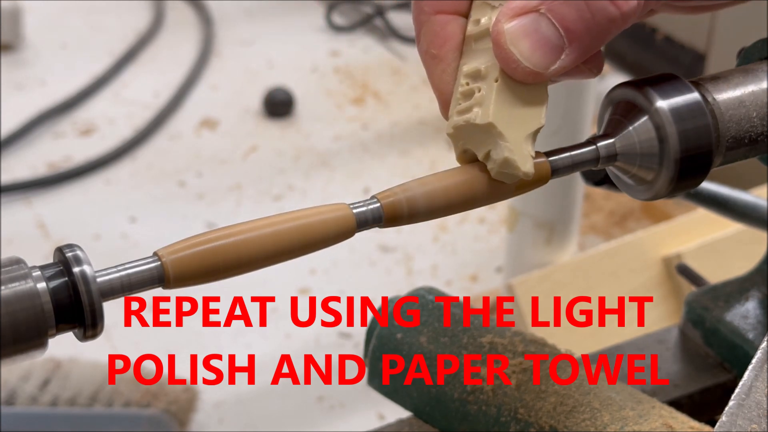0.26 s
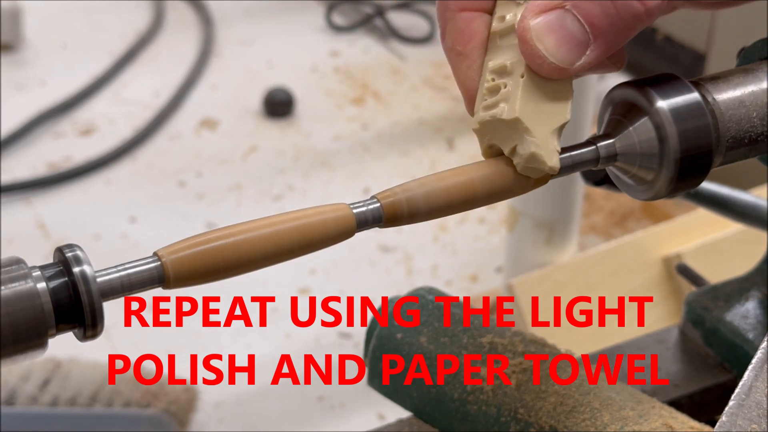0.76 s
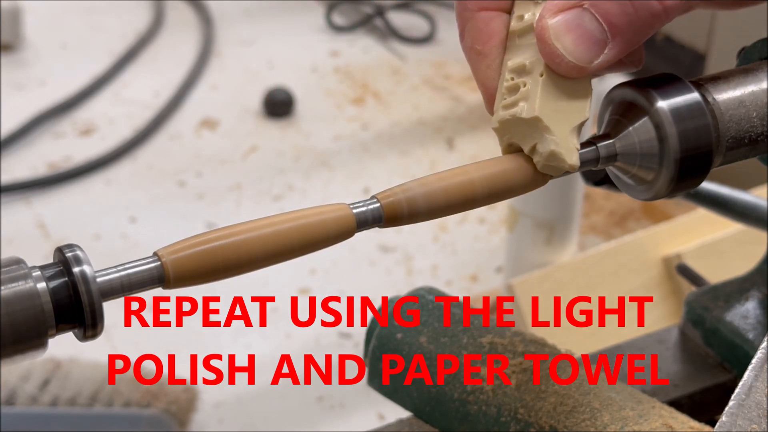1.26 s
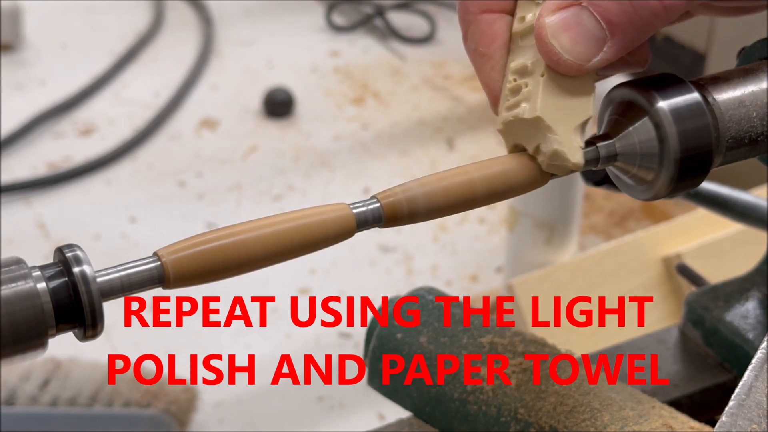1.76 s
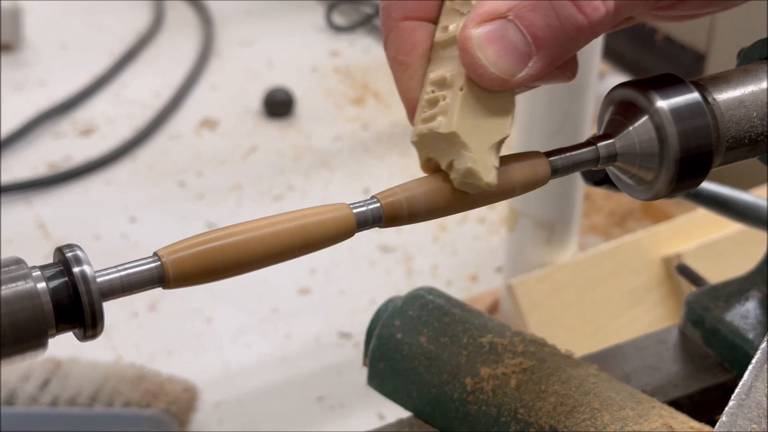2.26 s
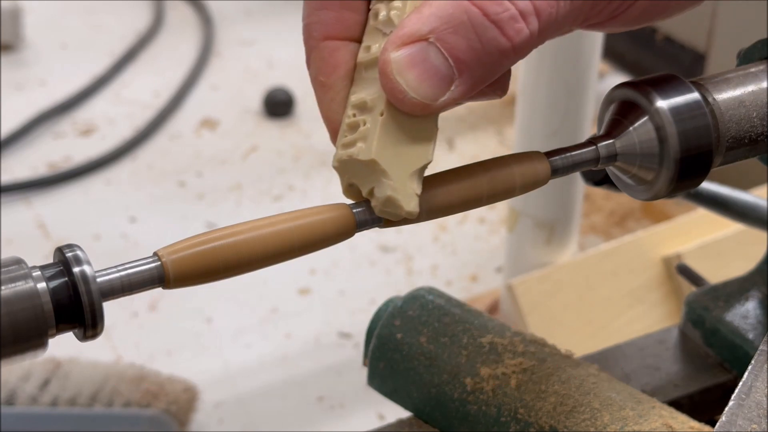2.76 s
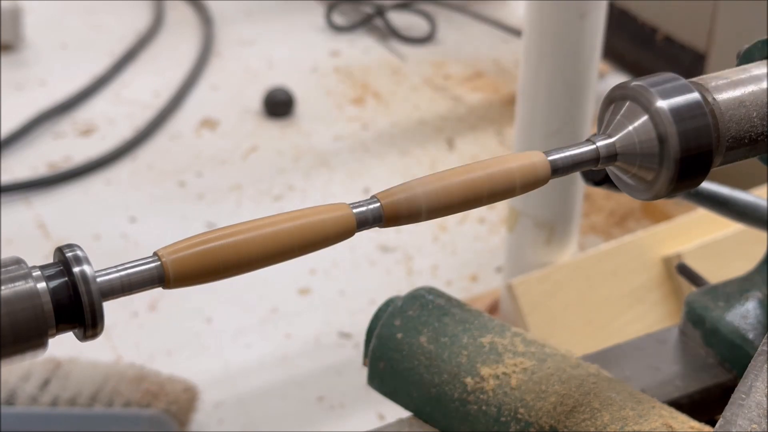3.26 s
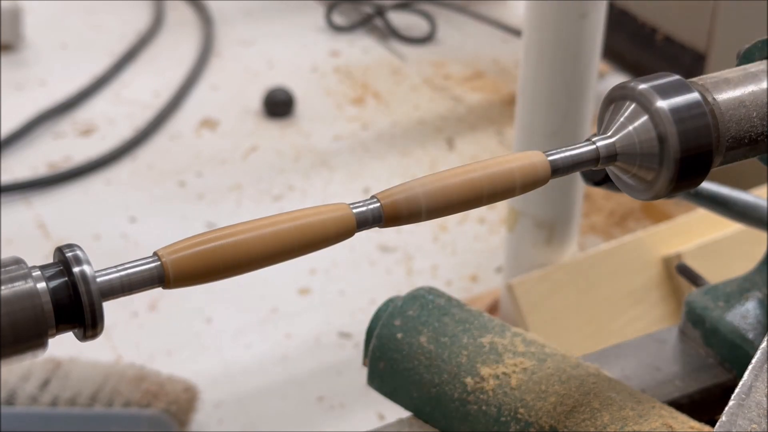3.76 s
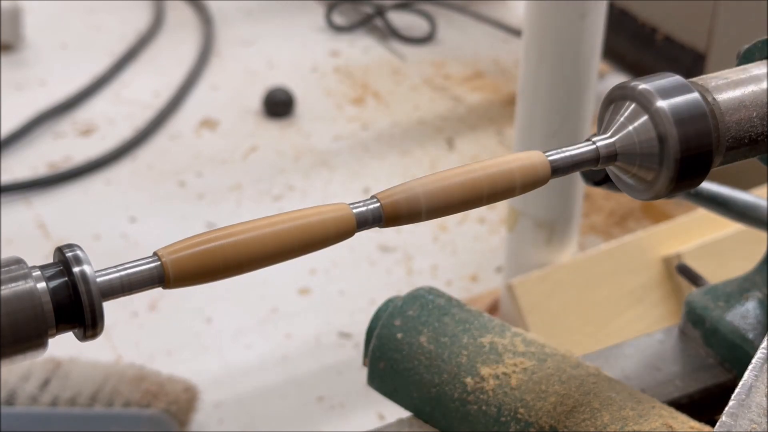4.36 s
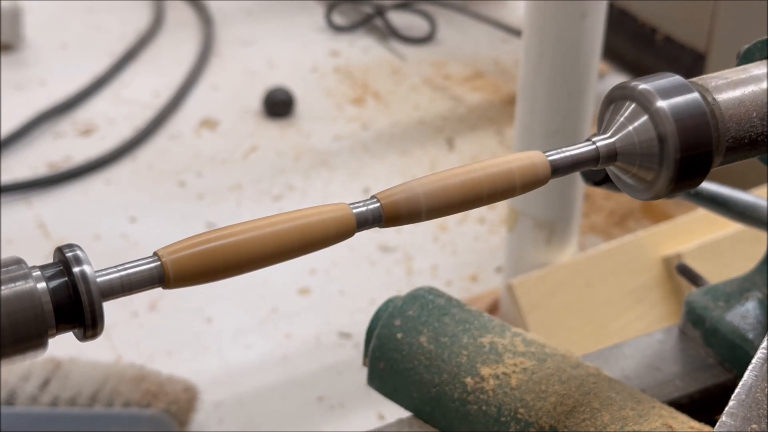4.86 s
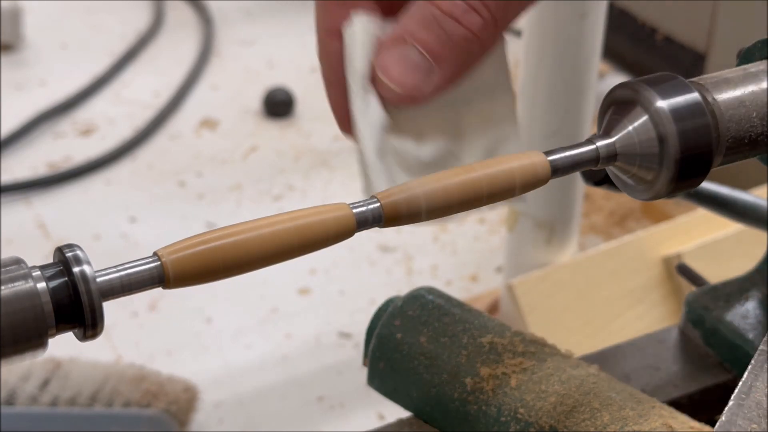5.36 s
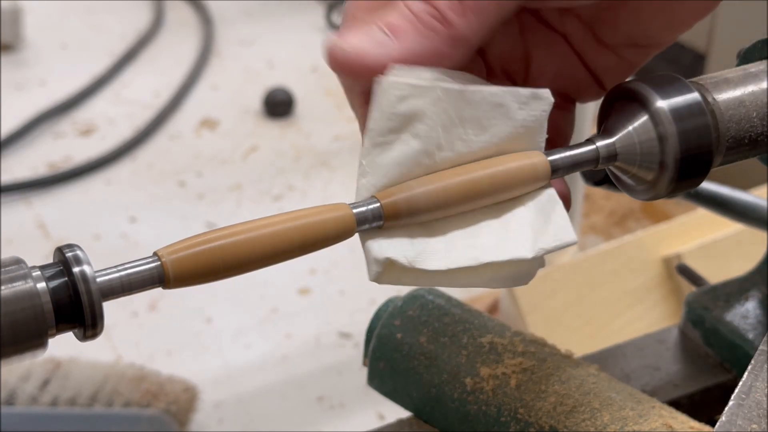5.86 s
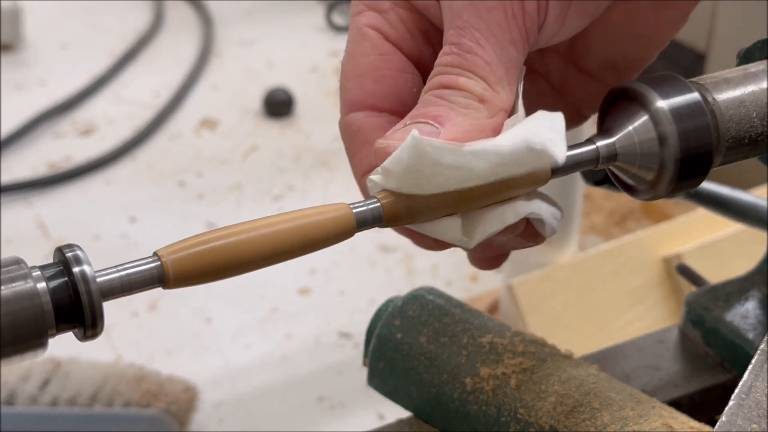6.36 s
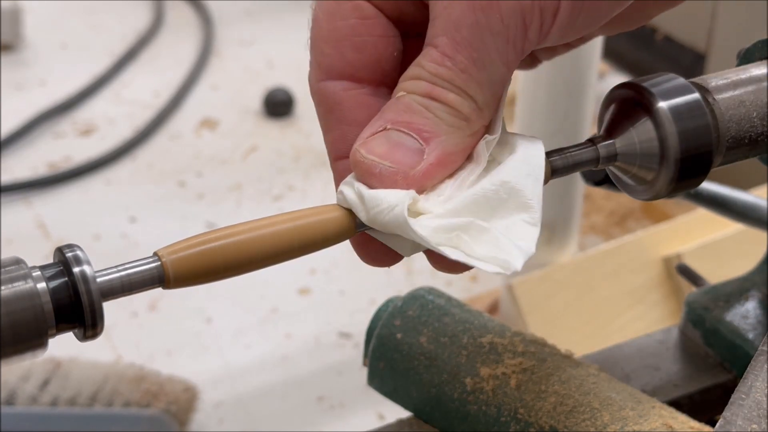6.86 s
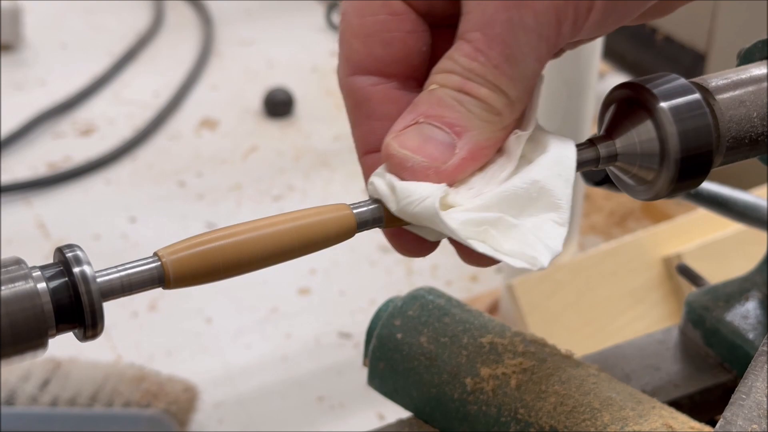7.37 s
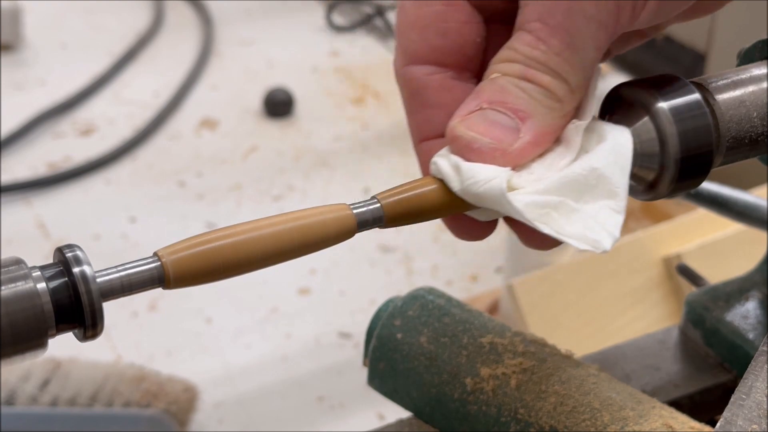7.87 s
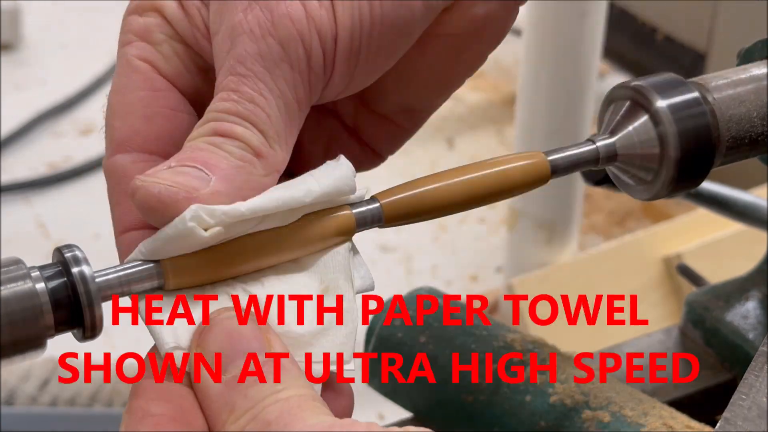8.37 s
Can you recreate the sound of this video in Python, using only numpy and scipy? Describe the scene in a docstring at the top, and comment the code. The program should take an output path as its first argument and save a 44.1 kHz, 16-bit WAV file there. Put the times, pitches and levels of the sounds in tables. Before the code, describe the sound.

A small belt-driven wood lathe is already spinning and holds a constant speed throughout, heard close and dry in stereo. Its bed combines low electrical hum, a slightly beating mid-pitched whine, rumbling belt flutter about nine times a second, a low spindle drone and fine bearing hiss. From 0 to 0.9 s a polish stick rubs faintly; thin dry scratching continues with small catches around 1.1 and 1.4 s. Fuller rubbing strokes with rough, low chatter come near 2.1 and 2.6 s, fading by about 3 s. The lathe runs alone, with a small dull knock at 3.8 s. At 5.46 s a tiny crisp tick marks the paper towel's touch, then airy friction hiss begins, strongest around 6.3 s, and slowly eases. A hard press makes a short, coarse chattering swell at 7.7 s while the drone dips. All sound cuts abruptly at 8.3 s, leaving brief silence.

```python
"""In a workshop, a belt-driven wood lathe spins a pen blank. The motor hums and whines as sines;
the belt loops a random shake through the cast frame once a lap; the spindle drones and its bearings
hiss as modulated noise. A stick of polish, then a paper towel, rubs the wood as coloured noise.
Two close microphone ports hear it, with level and phase differences, until an abrupt cut."""
import sys
import numpy as np
from scipy.fft import rfft, irfft, next_fast_len
from scipy.io import wavfile
from scipy.ndimage import map_coordinates

SR = 44100
rng = np.random.default_rng(int(sys.argv[2]) if len(sys.argv) > 2 else 0)


def wav_record(signal):
    """Record a signal, one row per channel, as 16-bit PCM in the file named by sys.argv[1]."""
    frames = np.transpose(np.atleast_2d(signal))
    bounded = np.clip(frames, -1, 1)
    # unit amplitude maps onto the largest positive 16-bit level
    quanta = np.round(bounded * 32767).astype(np.int16)
    wavfile.write(sys.argv[1], SR, quanta)


N = 379260

MAINS_HZ, SPINDLE_HZ, BELT_LAP_HZ, BALL_PASS_HZ = 60.02, 56.17, 8.655, 145.8
STROKE_ATTACK_S = 0.11

# Smooth strokes of the polish stick along the wood. Each row: start in seconds, end in seconds, level in dB.
STICK_STROKES = [(-.1, .88, -54), (1.85, 2.22, -47.5), (2.41, 2.71, -49)]


def amp(db):
    """Decibels to gain."""
    return np.exp(np.asarray(db) * np.log(10) / 20)


def unit(x):
    """Scale to rms 1."""
    return x / np.sqrt(np.mean(x ** 2) + 1e-20)


def clock():
    """Time of each sample in seconds."""
    return np.arange(N) / SR


def along(points, hz):
    """Read (Hz, value) points on a log frequency axis."""
    point_hz, value = np.transpose(points)
    return np.interp(np.log(hz + 1), np.log(point_hz + 1), value)


def wobble(knots_per_s):
    """Smooth random curve through normally distributed knots."""
    knots = rng.standard_normal(1024)
    coarse_s = clock()[::64]
    curve = map_coordinates(knots, [coarse_s * knots_per_s], mode="wrap")
    return np.interp(clock(), coarse_s, curve)


def filtered(x, response):
    """Multiply the spectrum of x by a response of frequency in Hz."""
    size = next_fast_len(N + 8192, True)
    spectrum = rfft(x, size) * response(np.fft.rfftfreq(size, 1 / SR))
    return irfft(spectrum, size)[..., :N]


def colour(x, spectrum, modes=()):
    """Two unrelated signals become a left-right pair of joint rms 1: broad spectrum plus resonances."""
    # Each row: frequency in Hz, left-right correlation from 0 to 1.
    likeness = [(50, .99), (200, .94), (350, .84), (700, .72), (1200, .66), (2000, .95), (4000, .94),
                (7000, .92), (7700, 1), (8800, 1), (9500, .86), (12000, .92), (14000, .76)]

    def response(hz):
        grid = hz[::16]
        power = np.ones(len(grid))
        for centre_hz, width_hz, db in modes:
            detuning = 2 * (grid - centre_hz) / width_hz
            power += (amp(db) ** 2 - 1) / (1 + detuning ** 2) ** 2
        gain = amp(along(spectrum, grid)) * np.sqrt(np.abs(power))
        turn = np.arccos(np.clip(along(likeness, grid), -1, 1)) / 2
        mid_gain = np.interp(hz, grid, gain * np.cos(turn))
        side_gain = np.interp(hz, grid, gain * np.sin(turn))
        return np.array([mid_gain, side_gain])

    mid, side = filtered(x, response)
    return unit(np.array([mid + side, mid - side]))


def noise():
    """Two unrelated white noises."""
    return rng.standard_normal((2, N))


def tones(lines, time, flutter_db, base_hz=1):
    """Sines at multiples of base_hz, random phases; each flutters a little in level."""
    out = np.zeros(N)
    for multiple, db in lines:
        phase = 2 * np.pi * (multiple * base_hz * time + rng.random())
        out += np.sqrt(2) * amp(db + flutter_db * wobble(9)) * np.sin(phase)
    return out


def cycle(hz, time):
    """Swing from -1 to 1 at a rotation rate."""
    return np.sin(2 * np.pi * hz * time)


def stroke(start_s, end_s, attack_s, release_s):
    """Linear rise from the start, hold, exponential decay after the end."""
    t = clock()
    rise = np.clip((t - start_s) / attack_s, 0, 1)
    return rise * np.exp(-np.maximum(t - end_s, 0) / release_s)


def swells(rows):
    """Sum of bell-shaped swells: centre s, half-length s at 1/e, peak dB."""
    return sum(amp(db) * np.exp(-((clock() - s) / length_s) ** 2) for s, length_s, db in rows)


def motor(shaft):
    """Magnetic hum locked to the mains, and whines of motor and pulleys that follow the shaft."""
    # Each row: multiple of the mains frequency, level in dB.
    hum_lines = [(2, -40), (4, -37), (6, -55), (10, -46), (12, -53.5), (14, -52), (16, -63.5)]
    # Close pairs beat. Each row: frequency in Hz, level in dB.
    whine_lines = [(580.1, -53), (591.6, -52), (686.2, -58), (731.5, -58), (745.5, -52), (773.8, -57),
                   (865.6, -55), (875, -50), (902.5, -56), (924.5, -54), (1005.2, -47.3), (1013.8, -48.6),
                   (1022.4, -59), (1373.9, -59.5), (1601.6, -62), (1626.5, -62), (1636.4, -62.5),
                   (1832, -65), (2099, -66)]
    hum = tones(hum_lines, clock(), flutter_db=0.5, base_hz=MAINS_HZ)
    return hum + tones(whine_lines, shaft, flutter_db=0.6)


def belt(shaft):
    """The belt's uneven surface shakes the frame the same way on every lap, over random rumble."""
    # Strongest flaps. Each row: multiple of the lap rate, level in dB.
    flap_lines = [(7, -47.5), (9, -50), (10, -47.5), (11, -49.5), (18, -53), (22, -48), (31, -55),
                  (32, -55), (35, -55), (51, -55)]
    # Broad spectrum. Each row: frequency in Hz, relative level in dB per Hz.
    rumble_spectrum = [(15, -27.5), (28, -13.5), (46, 1), (100, -0.5), (138, -5.5), (165, -1), (270, -2),
                       (360, -5.5), (420, -5.5), (510, -15.5), (950, -13), (1200, -18.5), (1800, -21.5),
                       (4000, -70)]
    # Frame and covers. Each row: centre in Hz, width in Hz, level in dB over the broad spectrum.
    frame_modes = [(161.5, 20, 3.5), (207, 26, 2.5), (408, 24, -0.5), (440.7, 48, 7.5), (591.7, 58, 14),
                   (743, 49, 11), (882, 34, 13.5), (910, 16, 7.5), (974, 20, 11), (1124, 21, 11)]
    random_share = 0.55  # of the power
    size = round(SR / BELT_LAP_HZ)
    surface = unit(irfft(np.exp(2j * np.pi * rng.random((2, size // 2 + 1))), size))
    position = shaft * BELT_LAP_HZ % 1 * size
    laps = np.array([np.interp(position, np.arange(size), side) for side in surface])
    shake = np.sqrt(1 - random_share) * laps + np.sqrt(random_share) * noise()
    rumble = amp(-36.5) * colour(shake, rumble_spectrum, frame_modes)
    return rumble + tones(flap_lines, shaft, flutter_db=0.6, base_hz=BELT_LAP_HZ)


def ripple(hz, depth_db, spacing_hz=40):
    """Uneven treble response of steel parts with many close, weak resonances."""
    bumps = np.interp(hz / spacing_hz, np.arange(2048), rng.standard_normal(2048))
    return amp(depth_db * bumps * (hz > 3500) * (hz < 11000))


def spindle(shaft):
    """Unbalance and play drone; the bearings hiss harder once a turn and as each ball passes."""
    # Each row: multiple of the turn rate, level in dB before the drone curve.
    drone_lines = [(1, -48.5), (4, -41), (5, -55.5), (7, -53.5)]
    # Drone curve, sinking under the hardest press. Each row: time in seconds, gain in dB.
    drone_curve = [(0, 0), (2.7, 1), (6.6, 3), (7.3, 2), (7.7, -7), (8.3, -2)]
    # Bearing hiss. Each row: frequency in Hz, relative level in dB per Hz.
    hiss_spectrum = [(300, -35.5), (800, -10.5), (1200, 0.5), (2000, -0.5), (2300, -3.5), (3300, -1.5),
                     (4000, -3.5), (5000, -5.5), (7000, -8.5), (9500, -9.5), (11500, -19), (13500, -17.5),
                     (15800, -18.5)]
    # Headstock. Each row: centre in Hz, width in Hz, level in dB over the broad spectrum.
    headstock_modes = [(1390, 19, 8.5), (1608, 22, 10.5), (1833, 62, 9.5), (2062, 60, 6.5),
                       (2375, 170, 4.5), (2834, 83, 7), (3078, 32, 7.5), (3219, 59, 10), (3392, 83, 10),
                       (3830, 130, 5.5), (4240, 150, 5.5), (5320, 180, 2.5), (5750, 96, 7.5),
                       (6875, 180, 10.5), (7280, 240, 11)]
    load_db = 0.5 * cycle(SPINDLE_HZ, shaft) + 0.55 * cycle(BALL_PASS_HZ, shaft)
    flicker_db = 0.6 * wobble(90) + 0.18 * wobble(7)
    rolling = filtered(noise(), lambda hz: ripple(hz, depth_db=1.1))
    hiss = amp(-41.5) * colour(rolling * amp(load_db + flicker_db), hiss_spectrum, headstock_modes)
    curve_s, curve_db = np.transpose(drone_curve)
    drone = tones(drone_lines, shaft, flutter_db=2.0, base_hz=SPINDLE_HZ)
    return hiss + amp(np.interp(clock(), curve_s, curve_db)) * drone


def rub(shaft, spectrum, turn_db, grain_db):
    """Friction noise whose grip swings once a turn and varies randomly with the grain."""
    grip = amp(turn_db * cycle(SPINDLE_HZ, shaft) + grain_db * wobble(110))
    return colour(noise() * grip, spectrum)


def polish_stick(shaft):
    """Smooth strokes of polish rub the spinning wood."""
    # Each row: frequency in Hz, relative level in dB per Hz.
    wax_spectrum = [(400, -28.5), (1100, 12.5), (2500, -7), (5000, 3), (10000, -1), (12000, -11),
                    (14300, 6), (15800, -4.5)]
    pressure = sum(amp(db) * stroke(start_s, end_s, STROKE_ATTACK_S, release_s=0.11)
                   for start_s, end_s, db in STICK_STROKES)
    return pressure * rub(shaft, wax_spectrum, turn_db=1.5, grain_db=1)


def dry_edge(shaft):
    """The stick's dry edge scratches until it is lifted, and catches on the wood."""
    # Each row: frequency in Hz, relative level in dB per Hz.
    scratch_spectrum = [(1200, -25.5), (4000, -8.5), (5000, -3), (6500, -13), (9000, -5), (10400, 7),
                        (11500, -9), (16000, -11)]
    # Catches. Each row: centre in seconds, half-length in seconds, level in dB.
    catches = [(1.085, .02, -57), (1.4, .13, -56.5), (1.83, .05, -62), (2.225, .045, -55),
               (2.43, .02, -58.5)]
    lift_s = 2.75
    contact = stroke(STICK_STROKES[0][0], lift_s, STROKE_ATTACK_S, release_s=0.15)
    pressure = amp(-61.5) * contact + swells(catches)
    return pressure * rub(shaft, scratch_spectrum, turn_db=2, grain_db=2.0)


def chatter(shaft):
    """Hard presses make the blank chatter: swells of friction noise."""
    # Each row: centre in seconds, half-length in seconds, level in dB.
    presses = [(2.097, 0.24, -45), (2.6, 0.21, -44.5), (6.318, 0.063, -54.5), (7.676, 0.076, -37)]
    # Each row: frequency in Hz, relative level in dB per Hz.
    chatter_spectrum = [(250, -8.5), (440, 12), (600, -2.5), (900, -1.5), (1400, 5.5), (2000, -3.5),
                        (2900, -1.5), (3600, -12.5), (5500, -10), (10000, -29.5)]
    return swells(presses) * rub(shaft, chatter_spectrum, turn_db=1.5, grain_db=1.2)


def ticks():
    """Short, exponentially dying noise bursts, each in its own band."""
    # A small knock in the machine, then the towel's first touch.
    # Each row: start in seconds, level in dB, centre in Hz, width in octaves, 60 dB decay in seconds.
    tick_rows = [(3.801, -29.5, 1450, .3, .055), (5.458, -29, 5300, .6, .013)]
    out = np.zeros(N)
    for start_s, db, centre_hz, octaves, t60_s in tick_rows:
        def band(hz):
            return np.exp(-0.5 * (np.log2((hz + 1) / centre_hz) / octaves) ** 2)
        burst = unit(filtered(noise()[0], band))
        age_s = clock() - start_s
        decay = np.exp(-np.log(1000) * np.abs(age_s) / t60_s)
        out += burst * (age_s >= 0) * amp(db) * decay
    return out


def towel_pressure():
    """The towel is laid on and held, squeezed once round the blank, then the hand eases off."""
    on_s, attack_s, level_db = 5.5, 0.091, -42.5
    ease_from_s, ease_db_per_s = 6.25, 3
    squeeze_s, squeeze_db, squeeze_attack_s = 6.31, 4.5, 0.13
    squeeze = stroke(squeeze_s - squeeze_attack_s, squeeze_s, squeeze_attack_s, release_s=0.34)
    eased_db = ease_db_per_s * np.maximum(clock() - ease_from_s, 0)
    landed = np.clip((clock() - on_s) / attack_s, 0, 1)
    return landed * amp(level_db + squeeze_db * squeeze - eased_db)


def towel(shaft):
    """A paper towel rubs the wood; its grip swings opposite to the stick's."""
    # Each row: frequency in Hz, relative level in dB per Hz.
    paper_spectrum = [(500, -31.5), (1500, -9), (2400, 1.5), (3300, 3), (5500, 2.5), (10000, 3.5),
                      (11800, -3.5), (13700, 0), (15800, -0.5)]
    return towel_pressure() * rub(shaft, paper_spectrum, turn_db=-1.8, grain_db=1.3)


def ports(hz):
    """Level and phase differences, shared half and half between the two microphone ports."""
    # Each row: frequency in Hz, left minus right level in dB.
    lean = [(40, 1), (120, 3), (235, .4), (400, .9), (590, 4.6), (730, 2.6), (880, 3.4), (1000, -1.2),
            (1200, .7), (2200, 0)]
    # Out of step in the treble, fully opposed near 8 kHz.
    # Each row: frequency in Hz, lead of left over right in radians.
    phase_lead = [(60, .15), (230, .28), (350, 0), (950, -.3), (2100, 0), (3300, .55), (6200, 0),
                  (7200, .9), (7800, 3.05), (8650, 3.1), (9200, 1.5), (10500, .3), (12500, -.3),
                  (15500, -2.1)]
    half = np.array([[0.5], [-0.5]])
    return amp(half * along(lean, hz)) * np.exp(1j * half * along(phase_lead, hz))


def scene():
    """All turning parts share one slightly drifting shaft time, in seconds."""
    shaft = clock() + 0.00025 * wobble(1.3) + 0.00003 * wobble(12)
    lathe = motor(shaft) + belt(shaft) + spindle(shaft)
    polishing = polish_stick(shaft) + dry_edge(shaft) + chatter(shaft) + towel(shaft)
    return filtered(lathe + polishing + ticks(), ports)


def record(dry):
    """Cut abruptly over 2 ms, then limit the band."""
    cut_s, top_hz = 8.29, 15830
    cut = dry * np.clip((cut_s - clock()) / 0.002 + 0.5, 0, 1)
    return filtered(cut, lambda hz: hz < top_hz)


dry = scene()
out = record(dry)
wav_record(out)
```